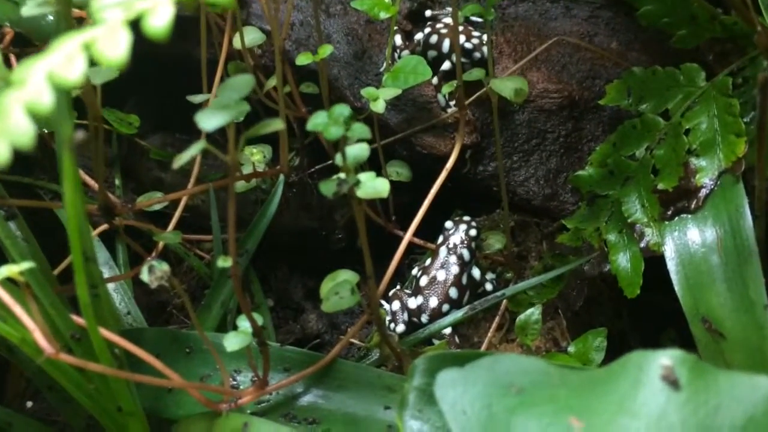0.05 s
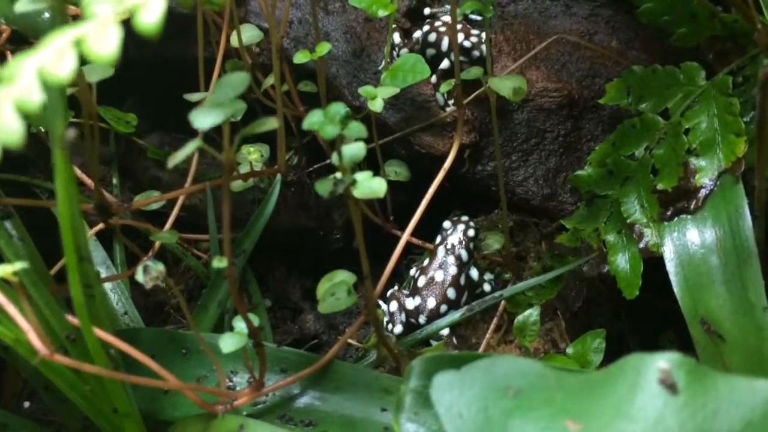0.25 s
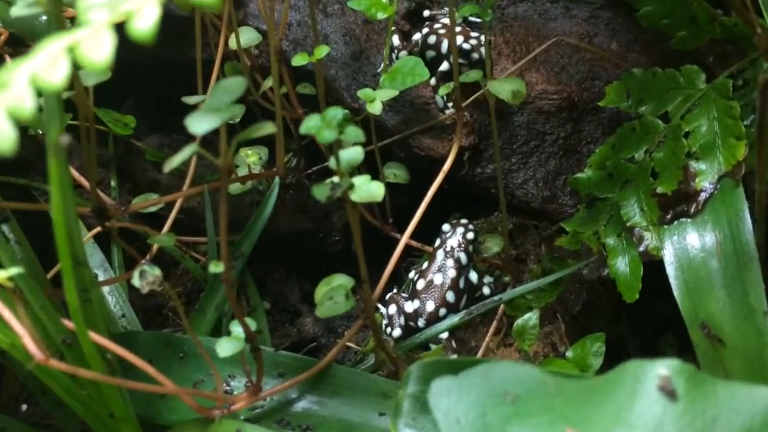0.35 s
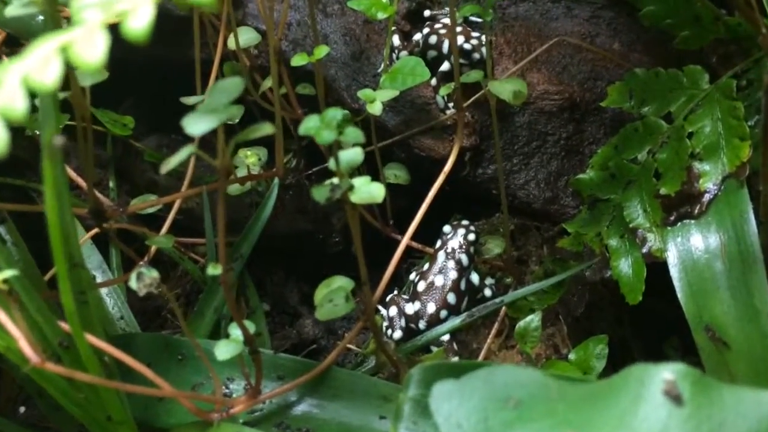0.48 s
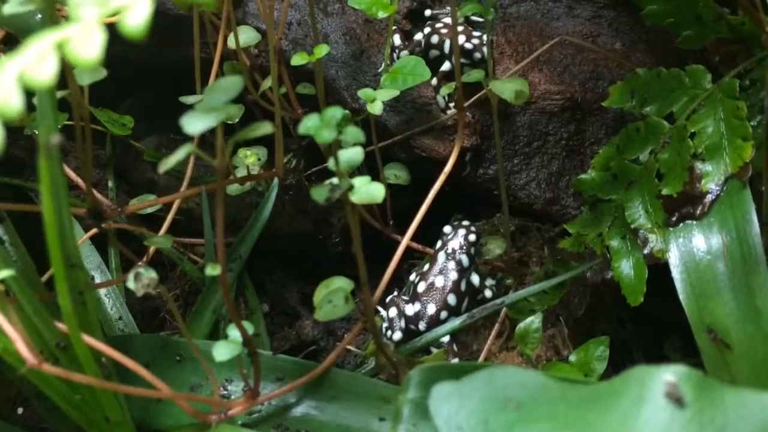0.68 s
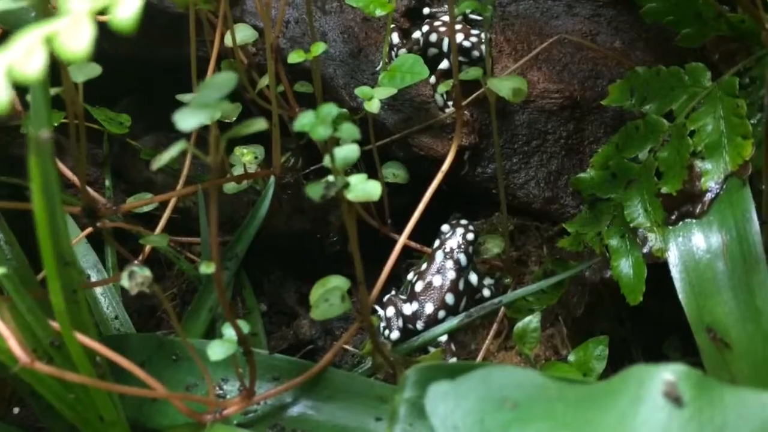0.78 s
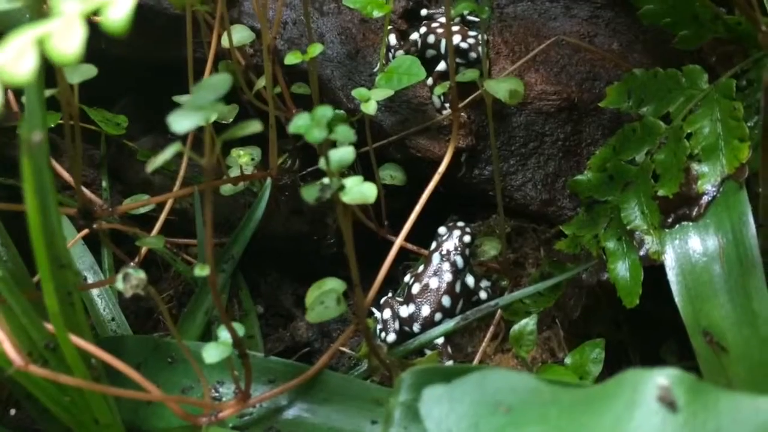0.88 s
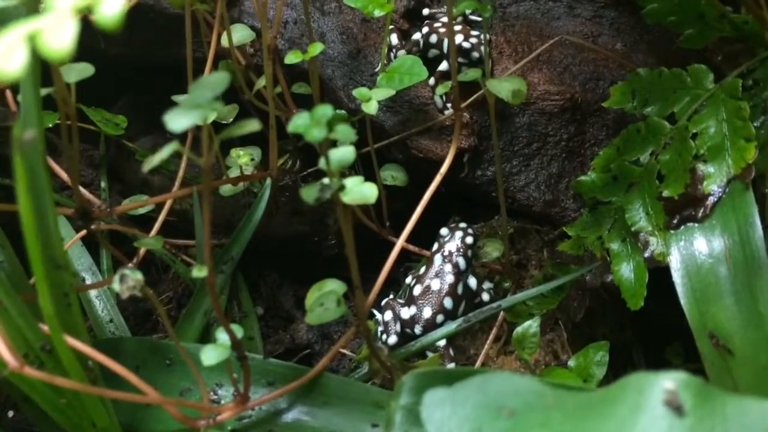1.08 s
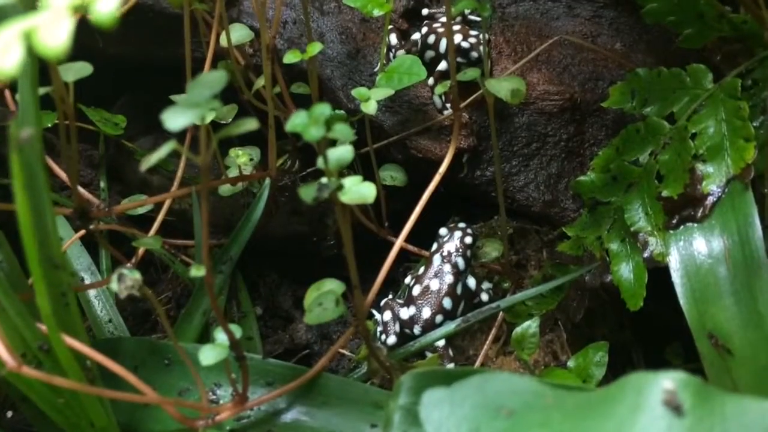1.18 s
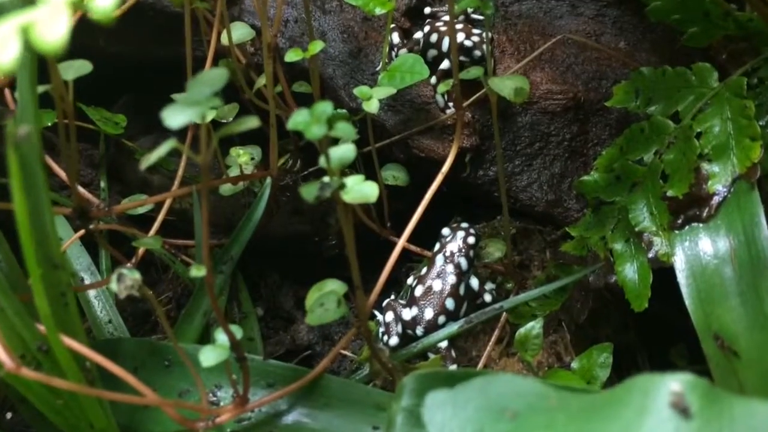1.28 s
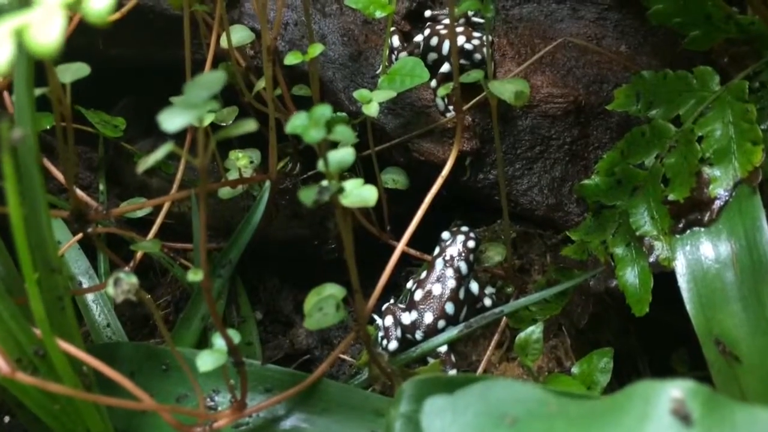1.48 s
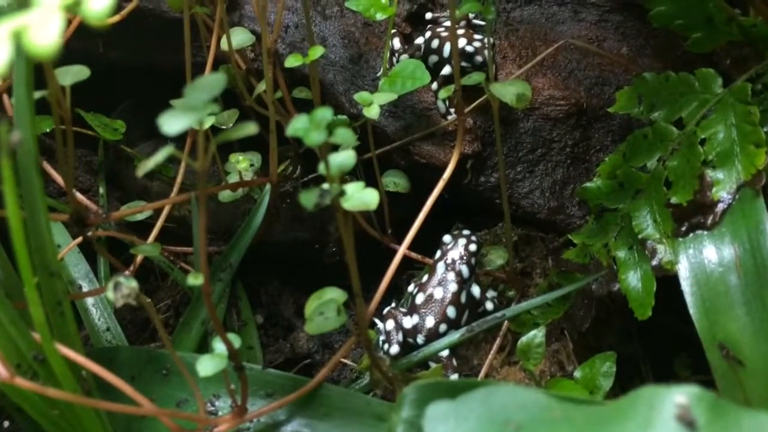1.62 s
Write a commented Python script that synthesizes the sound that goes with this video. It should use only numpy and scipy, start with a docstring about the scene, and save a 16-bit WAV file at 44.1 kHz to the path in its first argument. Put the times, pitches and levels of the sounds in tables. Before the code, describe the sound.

After a brief quiet moment with tiny wet ticks, a frog's bright, grating trill swells quickly, holds steady and stops, followed by one stray pulse; faint pump hum and hiss continue in a small enclosure.

```python
"""In a glass tank in a room, a small frog among leaves gives one buzzing trill, then a last lone pulse. The
trill runs at about 67 pulses a second; each is a burst of one to four vocal-fold snaps, modelled as clicks that
ring the vocal sac and let out a wet rasp of noise. Delayed returns follow in the ringing band, the later ones
echoing off the panes; tank and room blur the call. A pump hums on wavering sines, shaped noise makes a soft
room hiss and tiny wet ticks sound among the leaves."""
import sys
import numpy as np
from scipy import signal
from scipy.fft import rfft, irfft, next_fast_len
from scipy.io import wavfile
from scipy.ndimage import uniform_filter1d, map_coordinates

SR = 44100
rng = np.random.default_rng(int(sys.argv[2]) if len(sys.argv) > 2 else 0)


def dump_mix(stems):
    """Bounce the given channels to the path in sys.argv[1] as a 16-bit WAV at rate SR."""
    frames = np.atleast_2d(stems).T  # one column per channel
    limited = np.clip(frames, -1, 1)  # hard clip at full scale
    pcm = np.round(limited * 32767).astype(np.int16)
    wavfile.write(sys.argv[1], SR, pcm)


def invert_db(level):
    """Linear amplitude ratio for a level in decibels (20 dB per decade), elementwise."""
    return 10 ** (np.asarray(level, dtype=float) / 20)


N = 72765  # length in samples

# Pump hum lines: (frequency [Hz], mean level [dB rms])
HUM_LINES = [(118, -71), (140.6, -57.5), (209.9, -63), (491, -78.5), (1970, -82)]
HUM_WAVER_DB, HUM_KNOTS_PER_S, HUM_PHASE_RAD = 0.5, 27, 0.35  # level waver, its rate, phase wander

# Colour of the room hiss: (frequency [Hz], relative level [dB per Hz])
HISS_COLOUR = [(12, -69), (25, -32), (45, -18.5), (107, -12.5), (146, -9.5), (177, -16.5), (210, -8.5),
               (248, -21.5), (434, -17.5), (698, -37), (873, -24.5), (1860, -33.5), (2020, -28),
               (3070, -38), (14700, -50), (16000, -68)]
HISS_DB, PATCHY_DB = -59.5, 1.9  # overall rms level; rms spread of its patches
WHINE_HZ, WHINE_WIDTH_HZ = 2190, 110  # narrow hiss; width of one pass of its filter
WHINE_START_DB, WHINE_FADE_S = -72, 0.11  # rms level at the start; time to fall to 1/e

# Faint ticks among the leaves: (time [s], level [dB rms], length [ms])
LEAF_TICKS = [(.1335, -52.5, 2.8), (.187, -67.5, 2.1), (1.612, -69.5, 13)]
# Colour of the ticks: (frequency [Hz], relative level [dB])
TICK_COLOUR = [(1500, -28), (2400, 1), (3200, 1.5), (4200, -5), (9000, -9.5), (13000, -8), (15000, -29)]

# Trill pulses and their snaps, ahead of SNAP_DELAY_MS; gap 0 = no such snap:
# (time [s], gap to 2nd snap [ms], gap to 3rd [ms], gap to 4th [ms])
TRILL_PULSES = [(0.2154, 0, 0, 0), (0.2281, 2.33, 0, 0), (0.2419, 1.5, 0, 0), (0.2555, 1.84, 0, 0),
                (0.2702, 1.72, 0, 0), (0.2832, 1.56, 1.52, 0), (0.2983, 1.41, 1.86, 0),
                (0.3138, 1.22, 0, 0), (0.3262, 1.36, 1.22, 0), (0.3404, 1.27, 1.18, 1.2),
                (0.3557, 1.18, 1.13, 1.93), (0.3713, 1.18, 1.52, 0), (0.3854, 1.13, 1.41, 0),
                (0.399, 1.16, 1.11, 1.7), (0.415, 1.27, 0, 0), (0.4281, 1.45, 1.25, 0),
                (0.4433, 1.56, 1.68, 0), (0.458, 1.21, 1.35, 0), (0.4732, 1.43, 0, 0), (0.4875, 1.56, 0, 0),
                (0.5016, 1.47, 1.52, 0), (0.5167, 1.32, 1.93, 0), (0.5319, 1.41, 0, 0),
                (0.5463, 1.63, 0, 0), (0.5614, 1.63, 0, 0), (0.5752, 1.56, 1.38, 0), (0.5905, 1.5, 1.56, 0),
                (0.6067, 1.79, 0, 0), (0.6221, 1.93, 0, 0), (0.6361, 1.36, 2.56, 0), (0.6524, 2.22, 0, 0),
                (0.6666, 1.43, 0, 0), (0.6816, 1.77, 0, 0), (0.6965, 1.66, 0, 0), (0.7114, 1.59, 0, 0),
                (0.7256, 1.61, 1.95, 0), (0.7417, 1.66, 0, 0), (0.757, 2.29, 0, 0), (0.7717, 1.54, 0, 0),
                (0.7861, 1.72, 0, 0), (0.802, 0, 0, 0), (0.8164, 2.02, 0, 0), (0.8327, 0, 0, 0),
                (0.8481, 0, 0, 0), (0.8621, 1.9, 0, 0), (0.8769, 1.68, 0, 0), (0.8921, 1.75, 0, 0),
                (0.9068, 1.43, 0, 0), (0.9215, 1.77, 0, 0), (0.9368, 1.84, 0, 0), (0.9533, 2.15, 0, 0),
                (0.9694, 1.93, 0, 0), (0.9849, 2.11, 0, 0), (1.0, 1.79, 0, 0), (1.0154, 1.88, 0, 0),
                (1.0314, 0, 0, 0), (1.0466, 1.86, 0, 0), (1.0631, 0, 0, 0), (1.0795, 0, 0, 0),
                (1.1442, 1.97, 0, 0)]
SNAP_DELAY_MS = .03  # added to every time in TRILL_PULSES
# The frog's effort: (time [s], mean snap level [dB], later snaps over the first [dB], mean rasp level [dB])
FROG_EFFORT = [(0.216, 5, 1.5, -41), (.28, 8.5, 0.5, -38), (.34, 10, -0.4, -31.5), (.41, 11, -0.1, -34),
               (0.522, 12, 0, -33.5), (.7, 11.5, -.4, -36.5), (.95, 11.8, -0.6, -38), (1.046, 11, 0.5, -35),
               (1.079, 9, 9, -42.5), (1.144, 10, -3.5, -37)]
SNAP_SCATTER_DB, RASP_SCATTER_DB = 0.7, 3.5
# Weak trailing snaps after some pulses: (time [s], level relative to a first snap [dB])
TRAILING_SNAPS = [(.2875, -14), (.3459, -10.5), (.3467, -9.5), (.3484, -32.5), (0.3772, -17.5), (.3794, -6),
                  (.3895, -17), (0.4472, -12.5), (0.4482, -19), (.4616, -13), (0.596, -9), (.9398, -12.5)]
DULL_HZ = 9100  # later snaps are softer and lose their treble above this
# Slackness of the vocal sac: (time [s], slackness [0-1])
SAC_SLACKNESS = [(.22, 1), (.4, 1), (.52, 0.34), (1.08, 0.53), (1.14, 0.64)]
# Vocal sac and throat resonances, the width taken before SKIRT narrows it:
# (frequency [Hz], width [Hz], level when taut [dB], change when slack [dB])
SAC_RESONANCES = [(1423, 190, -31, 7), (2320, 353, -16.5, 2.2), (2867, 353, -5, 2.56), (3376, 500, 3.5, 0),
                  (3640, 120, 3.5, -9), (4145, 770, -5, 2.3), (4897, 600, -9.5, -1), (6130, 1350, -15, 1),
                  (6800, 320, -18.5, -5.5), (7320, 1000, -18.5, -8), (8400, 400, -35.5, 3),
                  (9150, 480, -28.5, -12.5), (9610, 230, -29, 10.5), (11200, 270, -49, -2.2),
                  (12050, 1000, -54, 6), (14360, 1600, -82, -3)]
SKIRT = 1.742  # power that steepens the flanks of each resonance
POSES, POSE_DB, POSE_SHIFT = 6, 1.5, .01  # throat shapes; scatter of level and of pitch (share)
MOBILE_HZ = 4600  # resonances above this follow the pose
# Notches in the voice: (frequency [Hz], width [Hz])
VOICE_NOTCHES = [(1750, 83), (2630, 38), (3840, 120), (3950, 70), (5350, 230), (6550, 118), (7200, 143),
                 (8000, 144), (8750, 300), (10300, 820)]
NOTCH_DEPTH = 0.6  # share of amplitude removed
# Treble roll-off of the voice: (frequency [Hz], gain [dB])
VOICE_ROLL_OFF = [(11500, -0.29), (13200, -10), (14800, -12.5), (15600, -28), (20000, -51.5)]
# Colour of the wet rasp: (frequency [Hz], gain [dB])
RASP_COLOUR = [(1000, -26.5), (1500, -13), (3000, 6), (5000, 3), (8500, -7.5), (9700, -9), (10500, -24.5),
               (13000, -23), (15000, -47), (16000, -62.5)]
RASP_T60_S = 0.02

# Delayed returns in the ringing band: (delay [ms], level [dB]); the later ones are echoes off the glass
RING_RETURNS = [(3.26, -15), (7.06, -13.5), (10.4, -24)]
PANE_HZ, PANE_WIDTH_HZ = 3650, 420  # the ringing band
# Decay inside the tank: (frequency [Hz], t60 [s])
TANK_DECAY = [(1000, 0.089), (3600, 0.044), (6000, 0.0086), (12000, 0.0119)]
# Decay of the room: (frequency [Hz], t60 [s])
ROOM_DECAY = [(1000, 0.133), (3600, 0.4), (6000, 0.13), (12000, 0.033)]
TANK_DB, TANK_RING_DB = -21.5, -26  # diffuse answer: broad, and extra in the ringing band
ROOM_DB, ROOM_RING_DB = -39, -32


def unit(x):
    """Scales a sound to rms 1."""
    return x / np.sqrt(np.mean(x ** 2) + 1e-20)


def along(points, hz):
    """Reads a (frequency, value) curve on a log frequency axis."""
    f, v = np.transpose(points)
    return np.interp(np.log(hz + 1), np.log(f + 1), v)


def wobble(rate):
    """A smooth random curve through rate knots a second."""
    knots = rng.standard_normal(int(N * rate / SR) + 4)
    return map_coordinates(knots, [np.arange(N) * rate / SR])


def filtered(x, response):
    """Multiplies the spectrum of x by a response of frequency."""
    m = 2 * next_fast_len(N // 2 + SR // 4)
    return irfft(rfft(x, m) * response(np.fft.rfftfreq(m, 1 / SR)), m)[:N]


def causal(gain):
    """Minimum-phase response with this gain, so nothing rings ahead of its snap."""
    cepstrum = irfft(np.log(gain + 1e-6))
    middle = len(cepstrum) // 2
    cepstrum[1:middle] *= 2
    cepstrum[middle + 1:] = 0
    return np.exp(rfft(cepstrum))


def peak(f, hz, width_hz):
    """One causal resonance, with gain 1 at its centre."""
    return 1j * f * width_hz / (hz * hz - f * f + 1j * f * width_hz)


def pump():
    """The pump hums on steady sine lines whose level and phase waver."""
    t = np.arange(N) / SR
    hum = np.zeros(N)
    for hz, db in HUM_LINES:
        level = np.sqrt(2) * invert_db(db + HUM_WAVER_DB * wobble(HUM_KNOTS_PER_S))
        phase = 2 * np.pi * rng.random() + HUM_PHASE_RAD * wobble(HUM_KNOTS_PER_S)
        hum += level * np.sin(2 * np.pi * hz * t + phase)
    return hum


def room_hiss():
    """Soft room noise, patchy in time and frequency."""
    z = signal.stft(rng.standard_normal(N), nperseg=512)[2]
    patches = uniform_filter1d(rng.standard_normal(z.shape), size=6, axis=0)
    patches = uniform_filter1d(patches, size=12, axis=1)
    noise = signal.istft(z * invert_db(PATCHY_DB * unit(patches)), nperseg=512)[1][:N]
    return invert_db(HISS_DB) * unit(filtered(noise, lambda f: invert_db(along(HISS_COLOUR, f))))


def fading_whine():
    """A narrow band of noise that fades away exponentially."""
    narrow = unit(filtered(rng.standard_normal(N), lambda f: peak(f, WHINE_HZ, WHINE_WIDTH_HZ) ** 2))
    fade = np.exp(-np.arange(N) / SR / WHINE_FADE_S)
    return invert_db(WHINE_START_DB) * fade * narrow


def ticks():
    """Tiny wet ticks among the leaves: short gated bits of coloured noise."""
    t = np.arange(N) / SR
    gate = sum(invert_db(db) * ((t > s) & (t < s + ms / 1000)) for s, db, ms in LEAF_TICKS)
    noise = unit(filtered(rng.standard_normal(N), lambda f: invert_db(along(TICK_COLOUR, f))))
    return uniform_filter1d(gate, size=30) * noise  # softened edges


def clicks(at, level):
    """Single-sample clicks of these levels at these sample positions."""
    return np.bincount(at, level, N)


def sac(f, slack, drift):
    """Resonances of sac and throat, with notches; the upper ones move with the throat's pose."""
    power = 0
    for (hz, width, db, change_db), u, v in zip(SAC_RESONANCES, *drift):
        mobile = hz > MOBILE_HZ
        level = invert_db(db + slack * change_db + POSE_DB * u * mobile)
        shape = abs(peak(f, hz * (1 + POSE_SHIFT * v * mobile), width)) ** SKIRT
        power = power + (level * shape) ** 2
    notches = np.prod([1 - NOTCH_DEPTH * abs(peak(f, hz, width)) for hz, width in VOICE_NOTCHES], axis=0)
    return causal(np.sqrt(power) * invert_db(along(VOICE_ROLL_OFF, f)) * notches)


def wet_rasp(at, db):
    """Every snap lets out a quickly dying puff of coloured noise."""
    decay = invert_db(-60 * np.arange(SR // 20) / SR / RASP_T60_S)
    puffs = signal.fftconvolve(clicks(at, invert_db(db)), decay)[:N]
    return filtered(puffs * rng.standard_normal(N), lambda f: causal(invert_db(along(RASP_COLOUR, f))))


def frog():
    """Each pulse is a quick run of snaps; every snap rings the same sac, slack or taut."""
    rows = np.array(TRILL_PULSES)
    gaps = np.c_[np.zeros(len(rows)), rows[:, 1:]]
    times = rows[:, :1] + (np.cumsum(gaps, axis=1) + SNAP_DELAY_MS) / 1000
    later = gaps > 0
    on = later.copy()
    on[:, 0] = True  # the first snap always sounds
    at = np.round(times[on] * SR).astype(int)

    effort_s, *efforts = np.transpose(FROG_EFFORT)
    first_db, later_db, rasp_db = (np.interp(times, effort_s, e) for e in efforts)
    snap_db = first_db + later_db * later + SNAP_SCATTER_DB * rng.standard_normal(times.shape)
    rasp_db = rasp_db + RASP_SCATTER_DB * rng.standard_normal(times.shape)
    level, later_on = invert_db(snap_db[on]), later[on]
    pose = np.repeat(rng.integers(POSES, size=len(rows)), on.sum(axis=1))  # one pose a pulse

    trail_s, under_db = np.transpose(TRAILING_SNAPS)
    trail_level = invert_db(under_db + np.interp(trail_s, effort_s, efforts[0]))
    trail = clicks(np.round(trail_s * SR).astype(int), trail_level)

    slack = np.interp(np.arange(N) / SR, *np.transpose(SAC_SLACKNESS))
    voice = wet_rasp(at, rasp_db[on])
    drifts = rng.standard_normal((POSES, 2, len(SAC_RESONANCES)))
    for k, drift in enumerate(drifts):
        posed = level * (pose == k)
        soft = clicks(at, posed * later_on)
        if k == 0:  # all trailing snaps share one pose
            soft = soft + trail
        dulled = filtered(soft, lambda f: 1 / np.sqrt(1 + (f / DULL_HZ) ** 4))
        snaps = clicks(at, posed * ~later_on) + dulled
        voice = voice + filtered(slack * snaps, lambda f: sac(f, 1, drift))
        voice = voice + filtered((1 - slack) * snaps, lambda f: sac(f, 0, drift))
    return voice


def tail(x, decays):
    """A diffuse answer of decaying noise, each frequency at its own speed; renewed every tenth of a second."""
    out, step = np.zeros(N + SR), SR // 10
    for i in range(0, N, step):
        hz, t, z = signal.stft(rng.standard_normal(SR // 3), SR, nperseg=64)
        decay = invert_db(-60 * t / along(decays, hz)[:, None])
        h = signal.istft(z * decay, SR, nperseg=64)[1]
        y = signal.fftconvolve(x[i:i + step], h / np.linalg.norm(h))
        out[i + 90:][:len(y)] += y  # starts 90 samples late
    return out[:N]


def ringing(f):
    """The band in which panes, tank and room ring."""
    return peak(f, PANE_HZ, PANE_WIDTH_HZ)


def ringing_returns(x):
    """Sends back a few delayed returns in the ringing band; the later ones echo off the glass panes."""
    def echoes(f):
        return sum(invert_db(db) * np.exp(-2j * np.pi * f * ms / 1000) for ms, db in RING_RETURNS)
    return filtered(x, lambda f: ringing(f) * echoes(f))


def tank_and_room(x):
    """Tank and room blur the call with diffuse tails, favouring the ringing band."""
    near = filtered(tail(x, TANK_DECAY), lambda f: invert_db(TANK_DB) + invert_db(TANK_RING_DB) * ringing(f))
    far = filtered(tail(x, ROOM_DECAY), lambda f: invert_db(ROOM_DB) + invert_db(ROOM_RING_DB) * ringing(f))
    return near + far


def scene():
    """The frog with its surroundings, ticks, pump and hiss, in one channel."""
    voice = frog()
    call = voice + ringing_returns(voice) + tank_and_room(voice)
    return (call + ticks() + pump() + room_hiss() + fading_whine())[None]


def band_limit(x):
    """A steep low-pass at the top of the band."""
    return signal.sosfilt(signal.butter(12, 16470, fs=SR, output="sos"), x)


def record(dry):
    """Takes the finished mix to its final form."""
    return band_limit(dry)


dry = scene()
out = record(dry)
dump_mix(out)
```